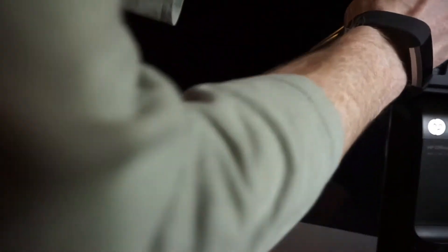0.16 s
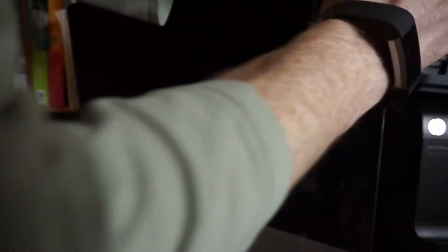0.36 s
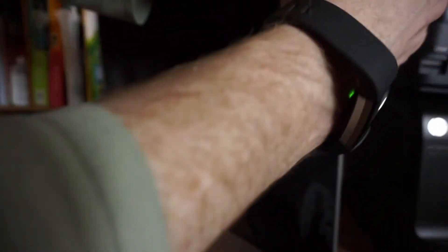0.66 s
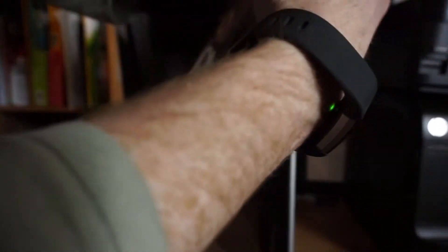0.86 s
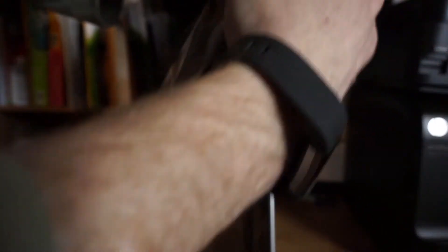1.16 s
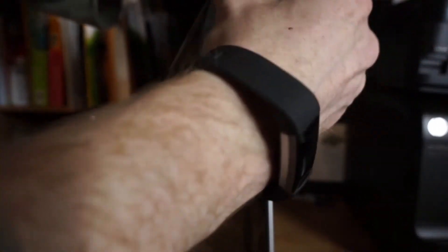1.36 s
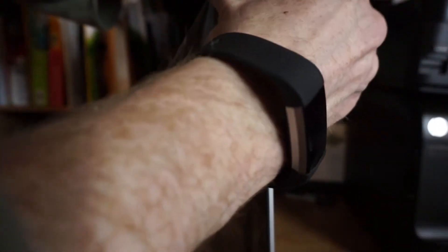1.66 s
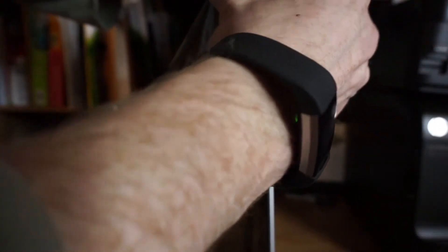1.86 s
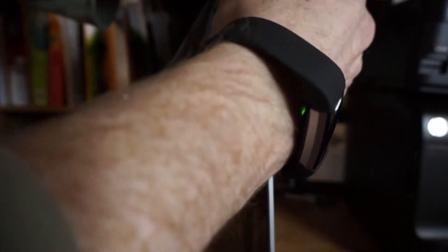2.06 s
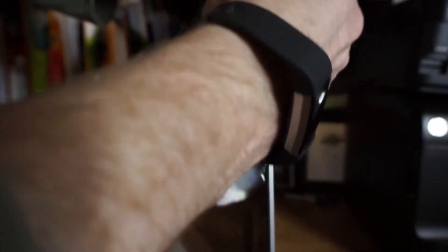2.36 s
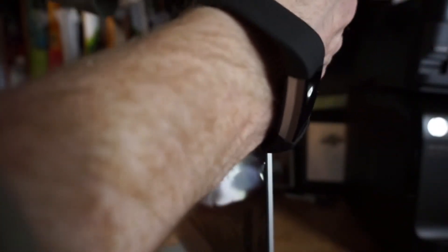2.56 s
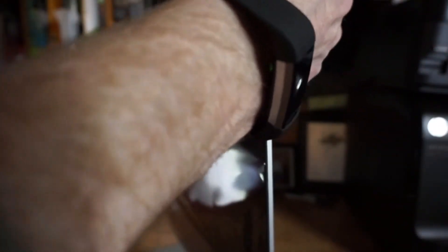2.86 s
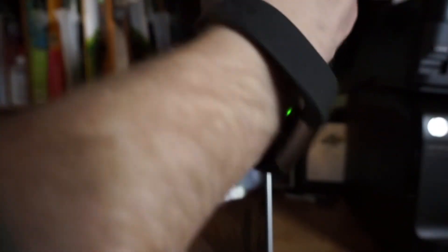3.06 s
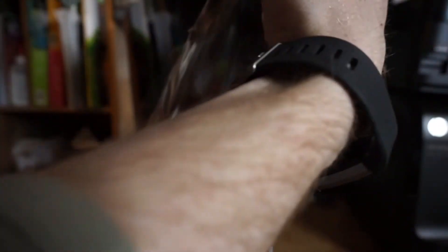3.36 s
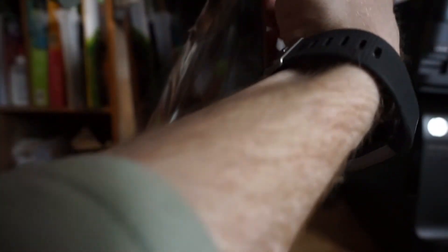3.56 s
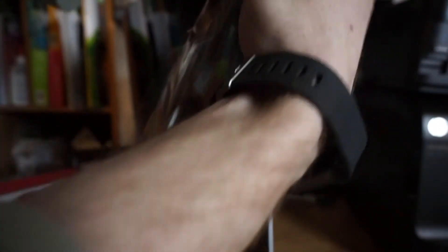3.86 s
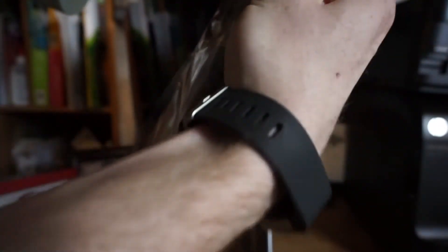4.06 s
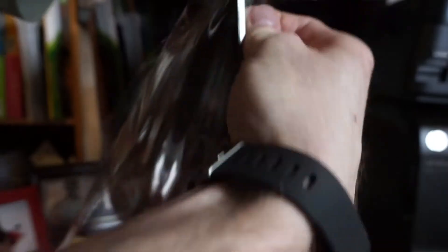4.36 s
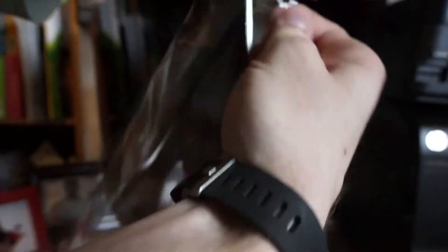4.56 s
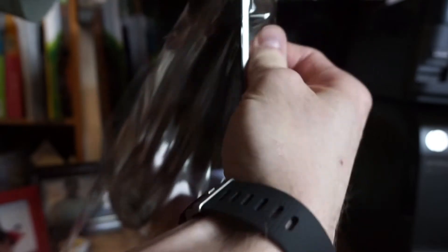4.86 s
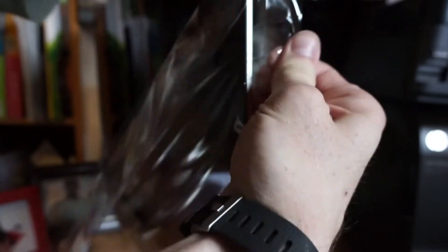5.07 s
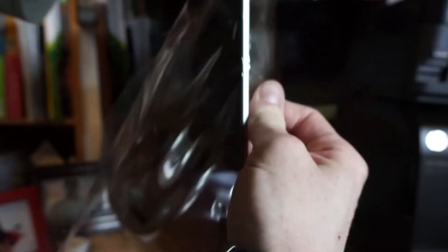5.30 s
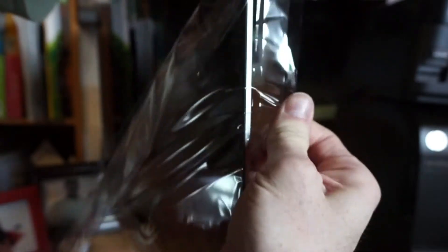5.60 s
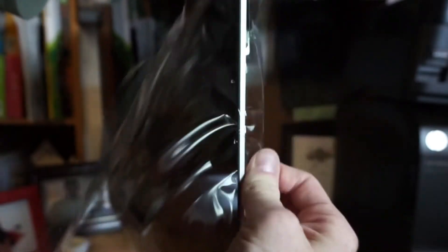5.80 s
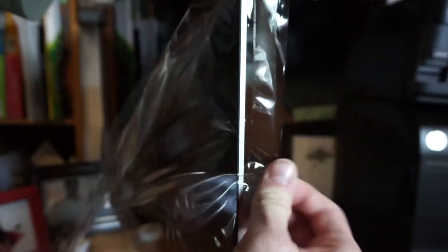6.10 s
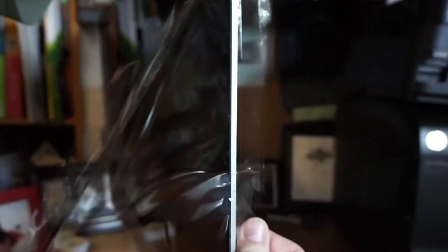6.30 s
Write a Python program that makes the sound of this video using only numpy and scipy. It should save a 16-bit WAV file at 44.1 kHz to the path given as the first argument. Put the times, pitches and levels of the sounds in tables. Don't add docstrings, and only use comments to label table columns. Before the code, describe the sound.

Close up in a quiet furnished room, a hand peels thin plastic film from a flat panel. A faint rustle leads to separate bright snaps and soft hollow knocks, thins out briefly past the middle, then returns as dense crackling and crinkling while the film comes away. Short room reflections, close stereo microphone.

```python
import sys
import numpy as np
from scipy import signal
from scipy.fft import rfft, irfft, next_fast_len
from scipy.io import wavfile
from scipy.ndimage import map_coordinates

SR = 44100
rng = np.random.default_rng(int(sys.argv[2]) if len(sys.argv) > 2 else 0)


def undo_db(level):
    steps = np.asarray(level, float) / 20
    return 10 ** steps


def dump(signal):
    limited = np.clip(np.atleast_2d(signal).T, -1, 1)
    pcm = np.round(limited * 32767).astype(np.int16)
    wavfile.write(sys.argv[1], SR, pcm)


N = 284004


def unit(x):
    return x / np.sqrt(np.mean(x ** 2) + 1e-20)


def along(points, hz):
    f, v = np.transpose(points)
    return np.interp(np.log(hz + 1), np.log(f + 1), v)


def filtered(x, response):
    m = next_fast_len(x.shape[-1] + 8192)
    spectrum = rfft(x, m) * response(np.fft.rfftfreq(m, 1 / SR))
    return irfft(spectrum, m)[..., :x.shape[-1]]


def coloured(x, points):
    cepstrum = irfft(np.log(undo_db(along(points, np.fft.rfftfreq(2048, 1 / SR)))))
    cepstrum[1:1024] *= 2
    cepstrum[1025:] = 0
    pulse = irfft(np.exp(rfft(cepstrum)))
    return signal.fftconvolve(x, pulse[None] / np.linalg.norm(pulse), axes=1)[:, :N]


def wobble(rate):
    knots = rng.standard_normal(int(N * rate / SR) + 4)
    return map_coordinates(knots, [np.arange(N) * rate / SR])


# frequency in Hz, likeness from 0 to 1.
LIKENESS = [(300, 0.89), (1000, 0.5), (3000, 0.055), (8000, 0.28)]


def pair(spectrum_of, x):
    def turn(hz):
        return np.arccos(np.clip(along(LIKENESS, hz), 0, 1)) / 2

    mid, side = filtered(x, lambda hz: spectrum_of(hz) * [np.cos(turn(hz)), np.sin(turn(hz))])
    return np.array([mid + side, mid - side])


# frequency in Hz, level in dB per Hz.
AIR_COLOUR = [(20, -5), (70, -5), (190, 7), (500, 2.5), (2000, -12), (12500, -10.5), (16000, -7.5)]


def room_air():
    noise = rng.standard_normal((2, N))
    return undo_db(-63.5) * unit(pair(lambda hz: undo_db(along(AIR_COLOUR, hz)), noise))


def strokes(rows, ease):
    hop = 64
    peak_s, swell_s, *levels = np.transpose(rows)
    t = np.arange(0, N + hop, hop) / SR - peak_s[:, None]
    t = t / np.maximum(swell_s, .005)[:, None]
    shape = undo_db(-15 * np.maximum(-t, t / ease))
    return [np.interp(np.arange(N) / hop, np.arange(t.shape[1]), undo_db(db) @ shape) for db in levels]


def ticks(per_s, spread_db, pan_db):
    size = undo_db(spread_db * np.minimum(rng.exponential(size=N), 3)) * rng.standard_normal(N)
    happens = rng.random(N) < per_s / SR
    return unit(size * happens) * undo_db([[pan_db / 2], [-pan_db / 2]])


def grains(per_s, hz, octaves, cycles, spread_db):
    length = 160
    when, pitch, size = rng.random((3, int(per_s * N / SR)))
    tone_hz = np.minimum(hz * 2 ** (octaves * (2 * pitch - 1)), 15850)[:, None]
    turns = tone_hz * np.arange(length) / SR
    ring = np.sin(2 * np.pi * turns) * np.exp(-turns / cycles) * np.sqrt(tone_hz / hz)
    ring -= ring.mean(axis=1)[:, None]
    ring *= undo_db(-spread_db * np.log(size + 0.039))[:, None]
    at = (when * N).astype(int)[:, None] + np.arange(length)
    return unit(np.bincount(at.ravel(), ring.ravel(), N + length)[:N])


# frequency in Hz, level in dB.
TAUT_COLOUR = [(300, -108), (2500, 0.5), (5000, 3), (8000, 3), (12000, 3.5), (16000, -2.5)]
# peak in seconds, swell in seconds, peel level in dB, slack rustle level in dB.
FILM_TUGS = [(0.01, 0.073, -59, -47), (0.31, 0.015, -50, -45.5), (0.5, 0.26, -51, -47.5),
             (0.7, 0.094, -45.5, -49), (0.8, 0.17, -58, -40), (1.0, 0.11, -51, -43.5),
             (1.33, 0.23, -50.5, -42.5), (1.42, 0.02, -49, -29.5), (1.69, 0.023, -47, -35.5),
             (1.76, 0.039, -46.5, -39), (2.06, 0.15, -52, -59), (2.15, 0.081, -71, -42),
             (2.28, 0.038, -36, -48), (2.48, 1, -51.5, -54), (2.75, 0.051, -40, -74),
             (3.14, 0.081, -47.5, -54.5), (3.46, 0.21, -66, -69), (3.64, 0.013, -53, -61),
             (3.94, 0.041, -45.5, -82), (4.29, 0.35, -47.5, -66), (4.64, 0.039, -30, -32),
             (4.8, 0.24, -55, -48), (5.07, 0.11, -45.5, -41.5), (5.35, 0.085, -46, -61),
             (5.57, 0.031, -27, -23.5), (5.75, 0.16, -40, -37.5), (5.89, 0.018, -35, -30.5),
             (6.03, 0.036, -27, -34), (6.22, 0.099, -42, -38.5), (6.36, 0.041, -37.5, -41.5)]


def tugged_film():
    pull, slack = strokes(FILM_TUGS, ease=0.86)
    rustle_gain = slack * undo_db(-5.5 + 3 * wobble(30))
    rustle = rustle_gain * grains(1100, hz=1857, octaves=1.32, cycles=2.0, spread_db=1.5)
    peel_gain = pull * undo_db(-2.5 + 1.8 * wobble(45))
    peel = peel_gain * grains(2200, hz=7900, octaves=0.78, cycles=3.9, spread_db=2.0)
    crackle = pull * undo_db(-10.5) * coloured(ticks(250, spread_db=4, pan_db=-3), TAUT_COLOUR)
    return crackle + peel * undo_db([[-1.1], [1.1]]) + rustle * undo_db([[-2.2], [2.2]])


# pitch in Hz, width in Hz, level in dB.
PANEL_MODES = [(202, 98, -9), (330.3, 59.5, 6), (522, 60, -3.5), (590, 50, -7.5), (1024, 13, -14)]


def panel_body(hz):
    modes = 0
    for k, (centre, width, db) in enumerate(PANEL_MODES):
        mode = 1j * hz * width / (centre * centre - hz * hz + 1j * hz * width)
        modes = modes + (-1) ** k * undo_db(db) * mode
    return modes * (1j * hz / (150 + 1j * hz)) ** 2


# frequency in Hz, level in dB.
STAND_COLOUR = [(15, -24.5), (50, -23), (90, -5), (124, -4), (180, 1), (300, -5.5), (1000, -74)]
# peak in seconds, swell in seconds, rub level in dB, stand sway level in dB.
PANEL_TOUCHES = [(0.02, 0.07, -58.5, -78), (0.5, 0.22, -51.5, -69), (0.95, 0.061, -38.5, -63),
                 (1.13, 0.047, -63.5, -48.5), (1.3, 0.13, -44.5, -63), (1.48, 0.04, -58, -56),
                 (1.72, 0.042, -38.5, -58), (2.05, 0.077, -37, -52.5), (2.25, 0.11, -46, -85),
                 (2.45, 0.044, -56.5, -54), (2.62, 0.12, -40.5, -53), (2.76, 0.11, -55, -83),
                 (2.92, 0.038, -63, -76), (3.1, 0.076, -54, -77), (3.24, 0.087, -51.5, -56),
                 (3.4, 0.025, -44.5, -85), (3.7, 0.42, -60, -79), (4.02, 0.023, -52, -58),
                 (4.25, 0.053, -52, -60), (4.44, 0.046, -46.5, -52), (4.65, 0.033, -37, -70),
                 (4.93, 0.077, -43.5, -49.5), (5.08, 0.13, -49, -52.5), (5.27, 0.028, -60, -42.5),
                 (5.4, 0.035, -45, -45.5), (5.59, 0.024, -51, -44), (5.78, 0.11, -50, -73),
                 (5.87, 0.065, -40.5, -40.5), (6.2, 0.014, -51, -69), (6.32, 0.11, -43.5, -43.5)]


def touched_panel():
    press, lean = strokes(PANEL_TOUCHES, ease=1.82)
    rub_gain = press * undo_db(-2.0 + 2.1 * wobble(30))
    catches = ticks(200, spread_db=-2, pan_db=7)
    rub = unit(filtered(catches, lambda hz: panel_body(hz) * np.abs(panel_body(hz)) ** 0.27))
    sway_gain = lean * undo_db(2.0 + 1.7 * wobble(8.7))
    sway = unit(coloured(ticks(300, spread_db=4.0, pan_db=4.5), STAND_COLOUR))
    return rub_gain * rub + sway_gain * sway


def bursts(s, db, pan_db, t60, rise, ring_hz=None):
    length = 320
    t = np.arange(length) / SR
    shape = undo_db(-60 * t / t60) * (1 - np.exp(-t / rise))
    z = rfft(rng.standard_normal((len(s), length)) * shape)
    z /= (np.abs(z) + 1e-9) ** 0.81
    if ring_hz is not None:
        hz, c = np.fft.rfftfreq(length, 1 / SR), ring_hz[:, None]
        soft_top = 1 / (1 + 1j * hz / (4.6 * c))
        ring = 2.06 * 1j * hz * 0.26 * c / (c * c - hz * hz + 1j * hz * 0.24 * c)
        z *= soft_top + ring
    puff = irfft(z) * np.sqrt(shape)
    puff /= np.linalg.norm(puff, axis=1)[:, None]
    creep = rng.standard_normal(puff.shape) * undo_db(-29 - 60 * t[::-1] / 0.012)
    puff = np.hstack([creep, puff]) * undo_db(db)[:, None]
    at = (np.round(s * SR).astype(int)[:, None] + np.arange(-length, length)).ravel()
    channels = []
    for side in (.5, -.5):
        panned = puff * undo_db(side * pan_db)[:, None]
        channels.append(np.bincount(at, panned.ravel(), N + length)[:N])
    return np.array(channels)


# start in
# seconds, snap level in dB, fold pitch in Hz, crease level in dB, flap level in dB.
BIG_CREASES = [(0.1486, -76, 3260, -45.5, -41.5), (0.2703, -29.5, 4440, -43.5, -46),
               (0.466, -40, 3530, -27.5, -22), (0.5308, -21.5, 5840, -27, -30),
               (0.5971, -10.5, 6700, -36, -35.5), (0.6148, -8, 11000, -19, -25),
               (0.6819, -13, 4900, -29, -34), (0.767, -19.5, 6780, -23.5, -29.5),
               (0.9262, -6, 4500, -22.5, -25.5), (1.0662, -9.5, 5940, -26, -30.5),
               (1.1359, -42, 3360, -38, -37.5), (1.2047, -10.5, 3340, -20, -28.5),
               (1.2328, -16.5, 4340, -21.5, -19), (1.2639, -2.5, 7460, -27, -28.5),
               (1.3656, -29, 3570, -31, -25.5), (1.4311, -8.5, 12100, -52, -41),
               (1.4398, -6.5, 9650, -43, -33.5), (1.814, -15, 7900, -101, -30.5),
               (2.0069, -11, 11900, -19.5, -12.5), (2.2152, -14, 12200, -30, -52),
               (2.3502, -1.5, 6170, -77, -32), (2.5519, -3.5, 13200, -23.5, -28),
               (2.8462, 2, 4660, -18.5, -21),
               (2.9772, -1.5, 5960, -46, -34), (3.1674, -27, 6540, -30.5, -34.5),
                  (3.2941, -16, 3600, -33.5, -37), (3.3491, -6.5, 9560, -31.5, -26.5),
                  (3.9481, -1.5, 8600, -33, -53), (3.9758, -18, 5670, -47, -60),
                  (4.0372, -4.5, 8740, -34, -48), (4.146, -12.5, 9300, -38, -68),
                  (4.1757, -17, 9700, -30, -55), (4.1902, -4, 4530, -21, -21.5),
                  (4.2044, -3.5, 7600, -20.5, -26), (4.3197, -8, 5000, -27.5, -36),
                  (4.4343, -9.5, 8640, -25.5, -50), (4.488, 2.5, 7150, -25.5, -61),
                  (4.5931, -3, 6500, -44, -53), (4.6122, -7, 5170, -26.5, -53),
                  (4.632, -9, 10300, -18, -29), (4.7451, -9.5, 4650, -26.5, -23.5),
                  (4.773, -10.5, 5760, -31, -28), (4.8251, -4, 9800, -30.5, -41),
                  (4.86, -9.5, 4500, -24, -26.5), (5.0334, -22, 6880, -27, -26),
                  (5.047, -11.5, 6590, -26, -49),
               (5.102, -14, 4700, -22.5, -28), (5.2275, -9, 6360, -24.5, -33),
                (5.2592, -17, 4830, -13.5, -15), (5.3093, -14.5, 3540, -21.5, -23),
                (5.3824, -26, 3390, -31, -33), (5.514, -11.5, 3460, -20, -32), (5.5268, -8, 4610, -23, -48),
                (5.5483, -5.5, 4200, -33, -40), (5.5571, -10.5, 4200, -38, -46),
                (5.6003, -11, 4300, -20.5, -24), (5.6981, -6, 5860, -33, -46),
                (5.7131, -6.5, 3880, -14.5, -27), (5.732, -20, 4050, -18.5, -15),
                (5.7378, -5, 3720, -30, -28), (5.8276, -9.5, 5090, -25, -27),
                (5.8817, -12.5, 3300, -25, -31), (5.9967, -9, 4600, -17, -29), (6.007, -1, 12400, -22, -47),
                (6.0497, -14, 4680, -15.5, -22.5), (6.0729, -10.5, 3830, -23.5, -33),
                (6.1762, -16.5, 3300, -20.5, -29), (6.2068, -14, 4700, -23.5, -21.5),
                (6.248, -11, 3700, -24, -46), (6.327, -14, 4470, -26, -32)]
# start in
# seconds, snap level in dB, fold pitch in Hz.
SMALL_FOLDS = [(0.2947, -28.5, 3100), (0.488, -30, 3540), (0.575, -44, 2480), (0.808, -31, 3000),
               (0.6186, -11, 7450), (0.7495, -19, 5000), (1.1644, -24, 10300), (1.4197, -22, 4500),
               (1.5824, -30, 6250), (1.737, -21.5, 13100), (1.9812, -16, 8700), (2.3437, -12, 5560),
               (2.5127, -24, 6200), (2.556, -9.5, 5100), (2.8362, -19, 4860), (2.9253, -19, 9900),
               (2.9625, -11.5, 10700), (3.153, -19.5, 6500), (3.1887, -14, 6700), (3.3447, -14.5, 6550),
               (3.5199, -25.5, 10200), (3.5279, -24, 11800), (3.98, -13, 5530), (3.9864, -14, 6650),
               (4.008, -14.5, 7500), (4.0262, -18, 10900),
               (4.301, -20, 8340), (4.4237, -19, 8400), (4.4868, -9, 10900), (4.6237, -11.5, 5400),
               (4.6286, -8, 4200), (4.6384, -8, 11200), (4.6632, -11, 6700), (4.8733, -12.5, 7700),
               (4.9792, -16, 9940), (5.063, -5, 6460), (5.1162, -11, 8250), (5.137, -19.5, 9700),
               (5.2039, -20, 4200), (5.2639, -3.5, 6000), (5.332, -18, 3800), (5.498, -25, 7300),
               (5.5404, -6.5, 8650), (5.5736, -10.5, 11300), (5.594, -16, 6140), (5.988, -14, 8400),
               (5.991, -3, 4860), (6.0346, -6, 7800), (6.352, -19, 6370), (6.3751, -18.5, 3760),
               (0.6008, -25, 11500), (0.6072, -30, 9000), (0.6248, -13, 5900), (1.0626, -24.5, 11400),
               (1.2366, -13.5, 2500), (1.237, -13, 2500), (1.2408, -9, 3060), (1.2754, -23, 5870),
               (1.2833, -19.5, 2500), (1.3571, -25.5, 3800), (1.4254, -14, 5900), (1.7433, -24.5, 3700),
               (1.8126, -24, 8400), (2.001, -12.5, 4100), (2.0078, -6.5, 11400), (2.023, -7.5, 11600),
               (2.2189, -16, 2860), (2.3465, -20, 12400), (2.3555, -25, 4460), (2.8318, -23, 8400),
               (2.9813, -16, 5320), (3.156, -21.5, 6400), (3.1725, -31.5, 2500), (3.1925, -18.5, 3100),
               (3.3539, -29, 2900), (3.9598, -12.5, 14000), (3.9816, -16.5, 5600), (4.0326, -10.5, 6700),
               (4.064, -18, 11700), (4.152, -21, 10900), (4.2107, -20, 7600), (4.341, -21.5, 5000),
               (4.438, -17, 9200), (4.4432, -29, 11100),
               (4.5031, -15.5, 5800), (4.5304, -17.5, 7500), (4.5762, -23, 4300), (4.5968, -13, 6900),
              (4.5993, -10, 7000), (4.604, -12.5, 2700), (4.6182, -9.5, 6800), (4.6258, -17, 5800),
              (4.6299, -14, 13300), (4.6344, -13, 8340), (4.6688, -11.5, 14000), (5.0211, -19.5, 6400),
              (5.038, -14, 2600), (5.0532, -19, 10500), (5.0728, -5, 9500), (5.1092, -18.5, 3500),
              (5.1136, -12.5, 4100), (5.121, -17.5, 5000), (5.2197, -20, 11000), (5.2454, -33.5, 9500),
              (5.5155, -17, 2800), (5.5374, -12.5, 12000), (5.5552, -6, 8700), (5.5808, -5, 4130),
              (5.6928, -21, 7700), (5.732, -8, 2500), (5.7439, -16, 2620), (5.7534, -20, 3900),
              (5.8469, -20, 2600), (5.8564, -15.5, 8000), (5.8643, -26, 4000), (5.8672, -19, 2500),
              (5.8847, -19, 3900), (6.0125, -17, 2500), (6.0178, -25, 7600), (6.0338, -11.5, 9000),
              (6.1874, -10, 2500), (6.1904, -21, 5800), (6.3087, -26, 2500)]
# frequency in Hz, level in dB.
CREASE_COLOUR = [(100, -81), (900, -28), (1700, -3.5), (2300, 4), (4200, -5), (8000, -16)]
FLAP_COLOUR = [(30, -78.5), (250, -20.5), (550, 9), (1200, 8), (1500, 10.5), (3000, -15.5)]


def snaps():
    small = []
    for start, db, hz in SMALL_FOLDS:
        small.append((start, db, hz, db - 23.5, db - 29.5))
    rows = BIG_CREASES + small
    s, snap_db, fold_hz, crease_db, flap_db = np.transpose(rows)
    pan_db = 3.3 * rng.standard_normal(len(s))
    taut = bursts(s, snap_db + 5.5, pan_db - 4.5, t60=0.0032, rise=0.0001, ring_hz=fold_hz)
    crease = bursts(s, crease_db + 15, pan_db - 12.0, t60=0.007, rise=0.00013)
    flap = bursts(s, flap_db + 15.5, pan_db + 0.82, t60=0.0091, rise=0.0007)
    return coloured(taut, TAUT_COLOUR) + coloured(crease, CREASE_COLOUR) + coloured(flap, FLAP_COLOUR)


# start in seconds, level in dB.
HAND_BUMPS = [(1.063, -24), (1.118, -28), (1.232, -33.5), (1.649, -35), (1.814, -16), (2.007, -24.5),
              (2.345, -28.5), (2.606, -19.5), (2.841, -19), (2.973, -32.5), (3.07, -31.5), (3.345, -34.5),
              (4.187, -25), (4.744, -27), (4.861, -23.5), (5.036, -26), (5.261, -15.5), (5.727, -28),
              (6.181, -41), (0.933, -34), (1.693, -29.5), (1.72, -37), (1.737, -26), (2.13, -29.5),
              (2.2, -30), (2.457, -30), (2.707, -32.5), (2.806, -37), (4.316, -31), (4.424, -37),
              (5.306, -42), (5.389, -37), (5.595, -27.5), (5.769, -30), (5.822, -33), (5.85, -29),
              (6.245, -35), (6.306, -33), (6.376, -30.5)]


def knocks():
    s, db = np.transpose(HAND_BUMPS)
    blows = bursts(s, db, np.full(len(s), 4.0), t60=0.02, rise=0.001)
    boom = undo_db(37.5) * filtered(blows, panel_body)
    shake = undo_db(3) * coloured(blows, STAND_COLOUR)
    return boom + shake


# delay in seconds, level in dB.
WALL_ECHOES = [(.0042, -12), (.0087, -18)]


def walls(x):
    def echoes(hz):
        return sum(undo_db(db) * np.exp(-2j * np.pi * hz * s) for s, db in WALL_ECHOES)

    return filtered(x[::-1], echoes)


# frequency in Hz, time to fall 60 dB in seconds.
ROOM_DECAY = [(300, 0.19), (2000, 0.25), (5500, 0.19), (14600, 0.17)]
# frequency in Hz, room energy against direct sound in dB.
ROOM_COLOUR = [(200, -5.5), (800, -0.5), (2500, 1), (8000, -4.5), (15000, -0.5)]


def room(x):
    wet, step = np.zeros((2, N + SR)), 4096
    for start in range(0, N, step):
        hz, t, z = signal.stft(rng.standard_normal((2, SR // 3)), SR, nperseg=256)
        decay = undo_db(-60 * t / along(ROOM_DECAY, hz)[:, None])
        tail = signal.istft(z * decay, SR, nperseg=256)[1]
        tail *= np.clip(np.arange(tail.shape[1]) / SR / 0.0011, 0, 1)
        tail /= np.linalg.norm(tail[0])
        part = signal.fftconvolve(x[None, start:start + step], tail, axes=1)
        wet[:, start:start + part.shape[1]] += part
    return pair(lambda hz: undo_db(along(ROOM_COLOUR, hz)), wet[:, :N])


def scene():
    near = tugged_film() + touched_panel() + snaps() + knocks()
    return near + walls(near) + room(near.mean(axis=0)) + room_air()


def top_cut(x):
    return signal.sosfilt(signal.butter(12, 15850, fs=SR, output="sos"), x)


def record(dry):
    rounded = dry / (1 + np.abs(dry / .97) ** 8) ** (1 / 8)
    return top_cut(rounded)


dry = scene()
out = record(dry)
dump(out)
```